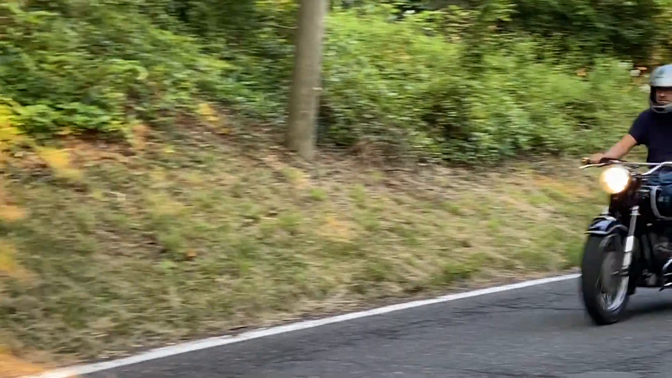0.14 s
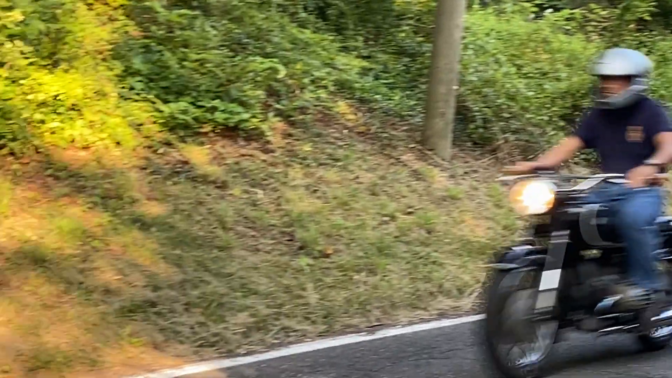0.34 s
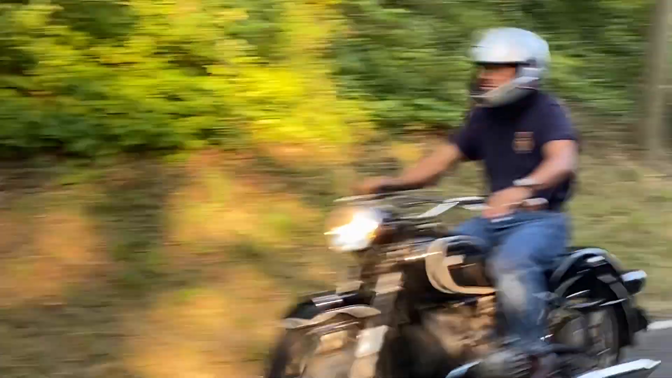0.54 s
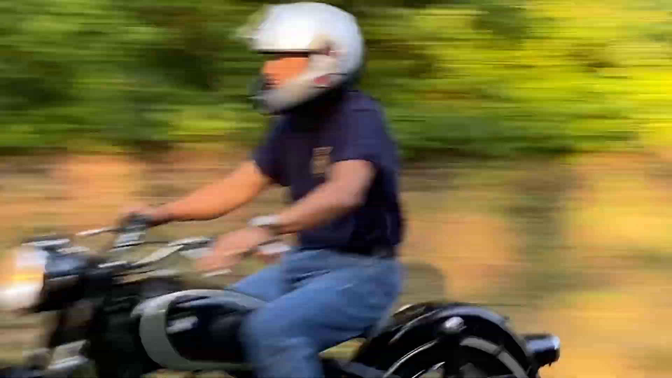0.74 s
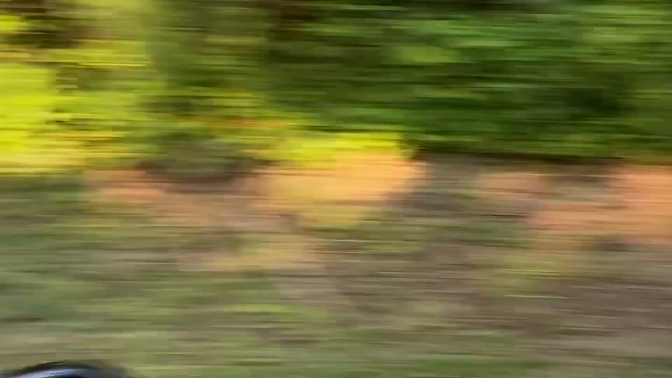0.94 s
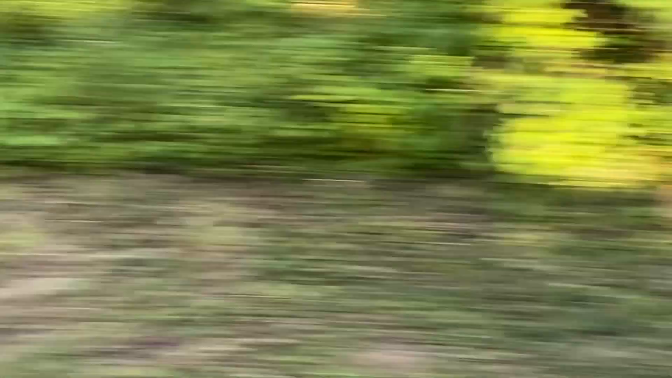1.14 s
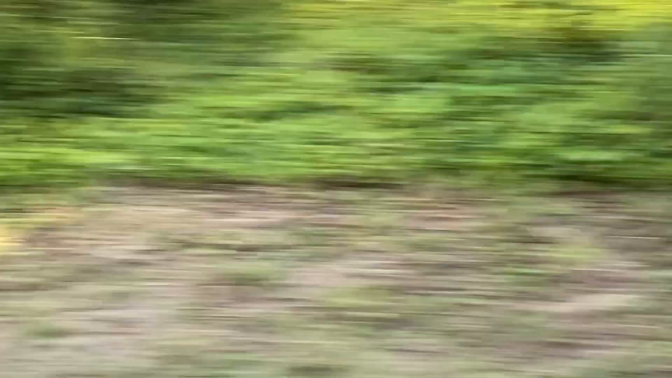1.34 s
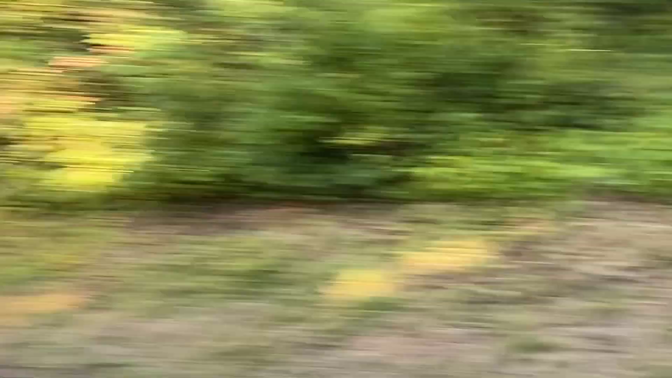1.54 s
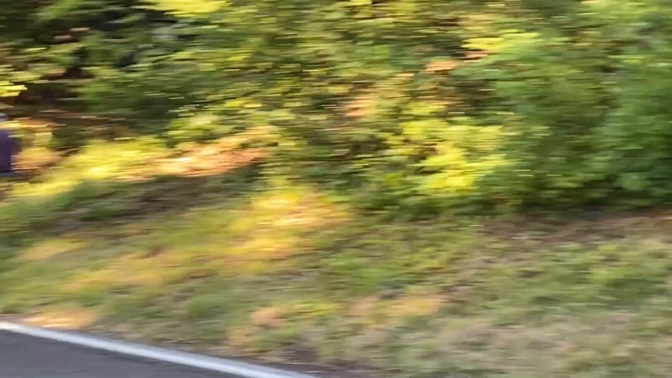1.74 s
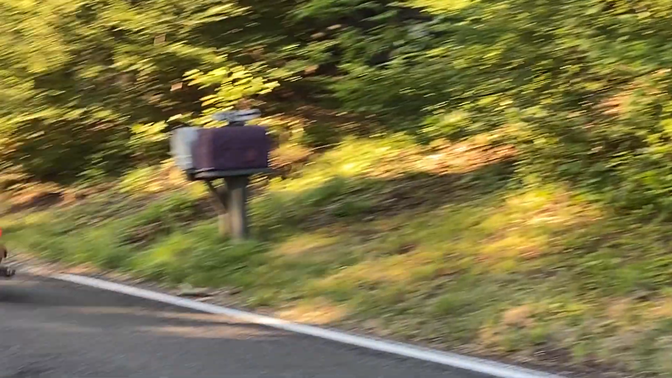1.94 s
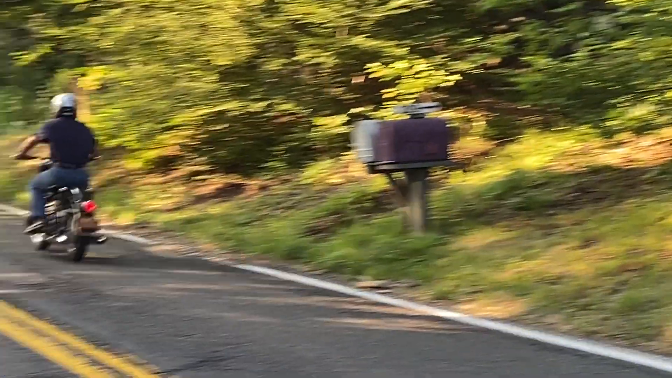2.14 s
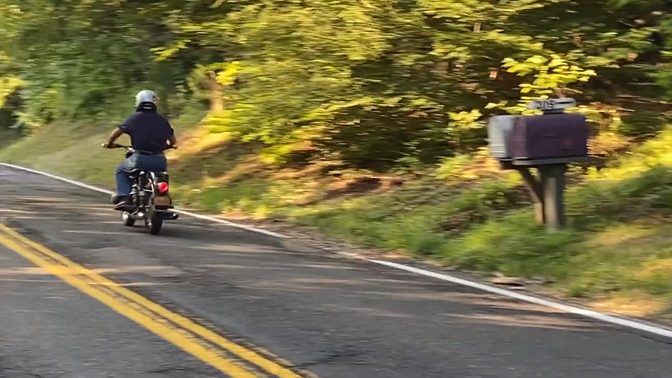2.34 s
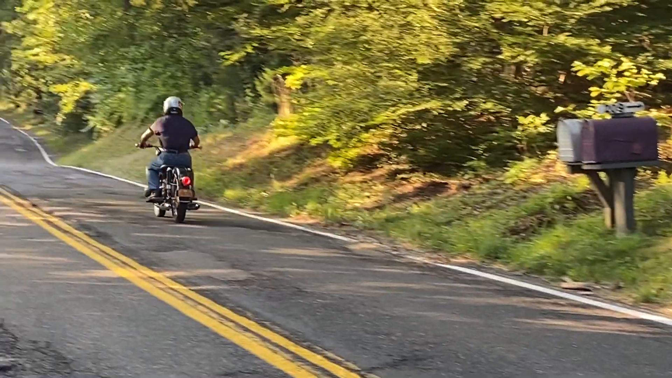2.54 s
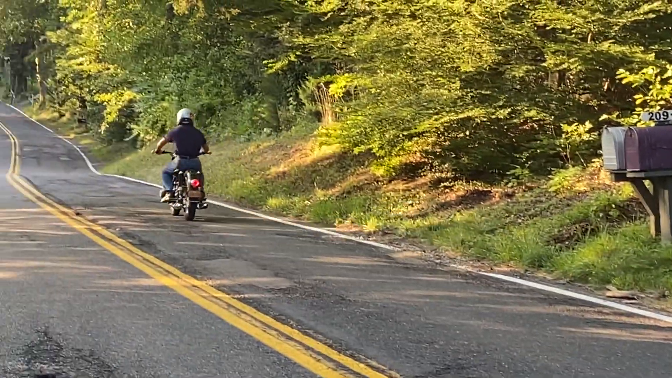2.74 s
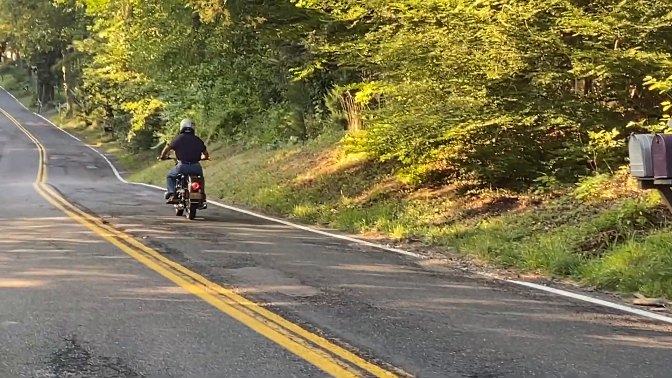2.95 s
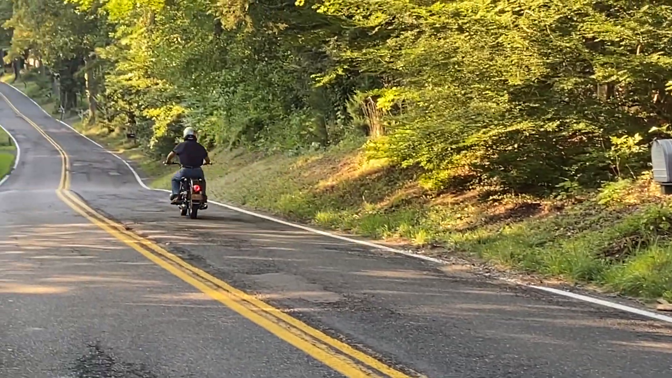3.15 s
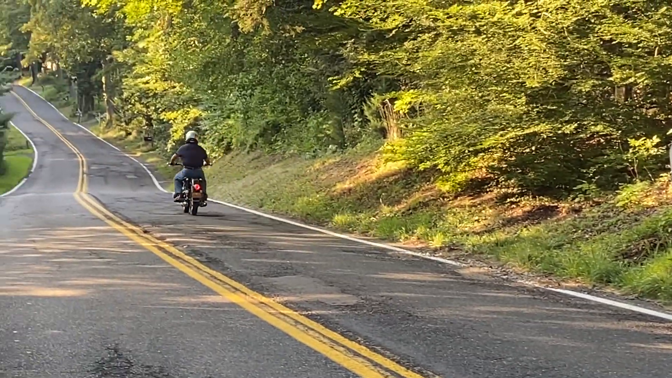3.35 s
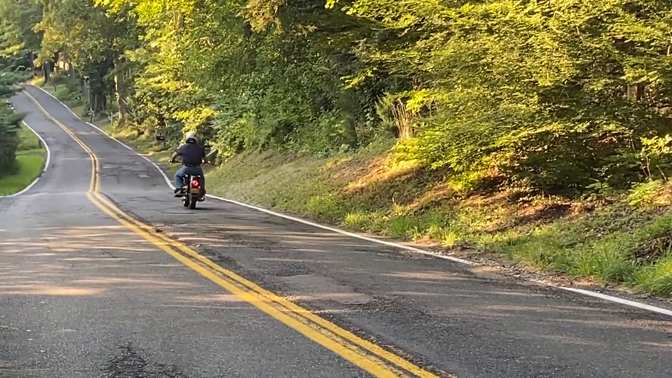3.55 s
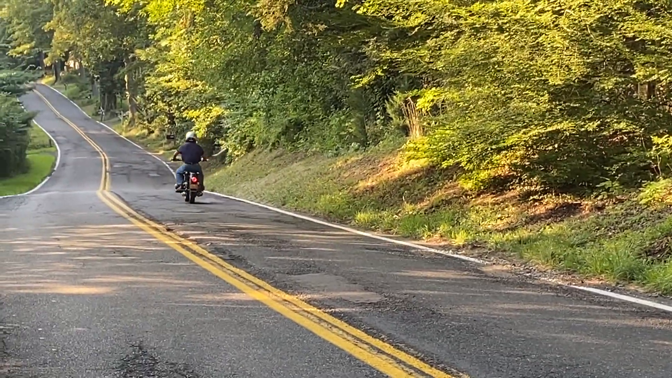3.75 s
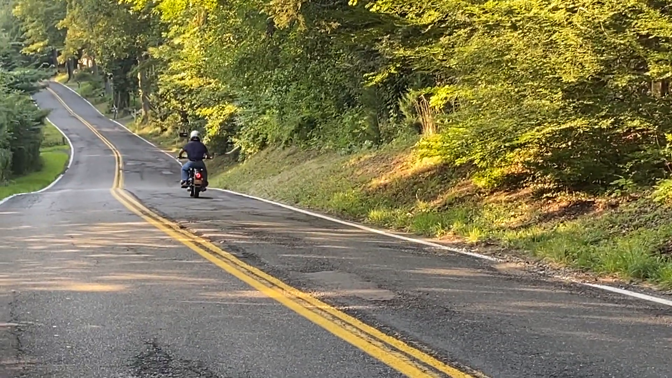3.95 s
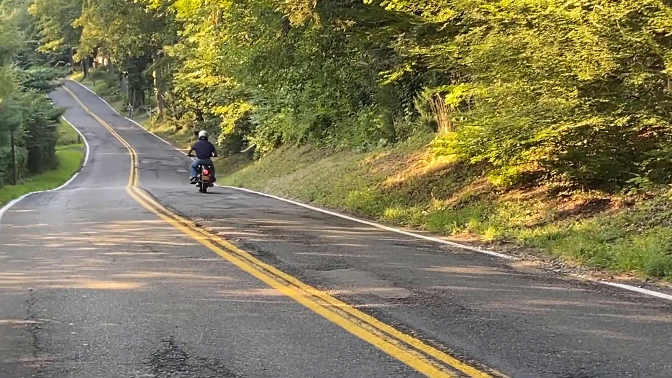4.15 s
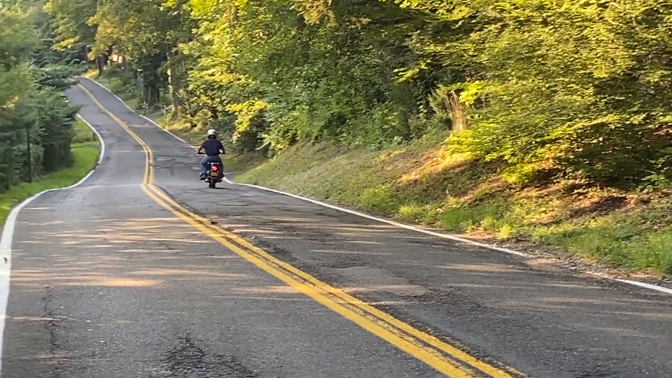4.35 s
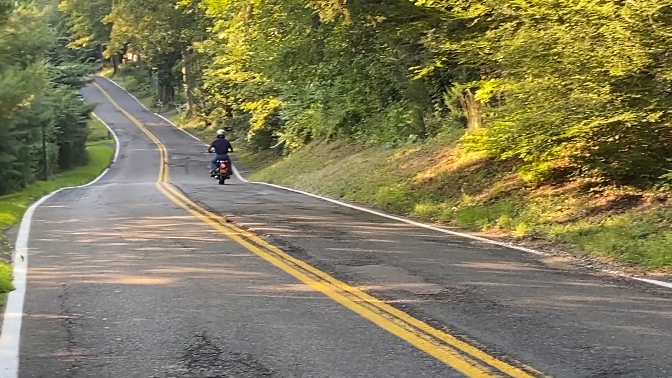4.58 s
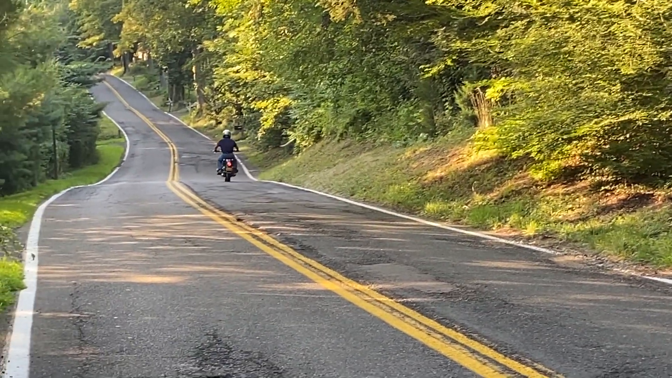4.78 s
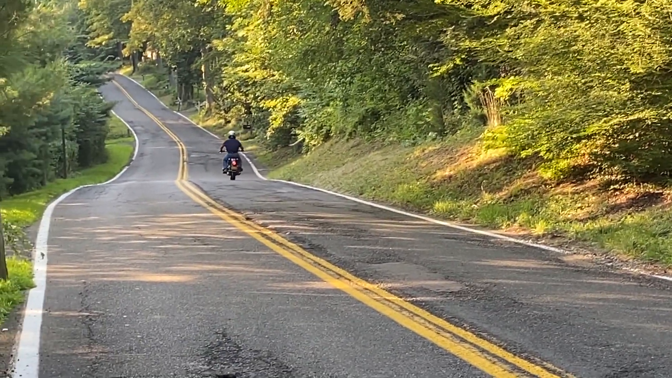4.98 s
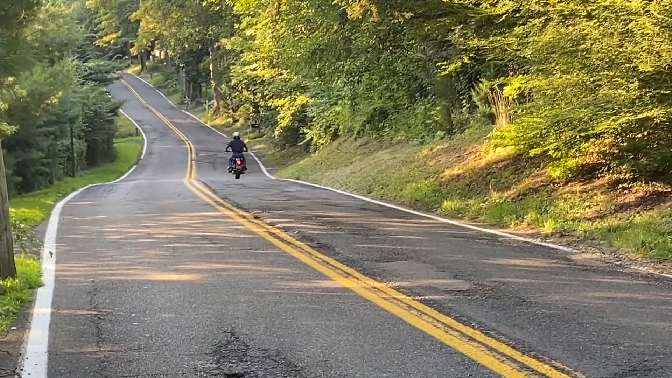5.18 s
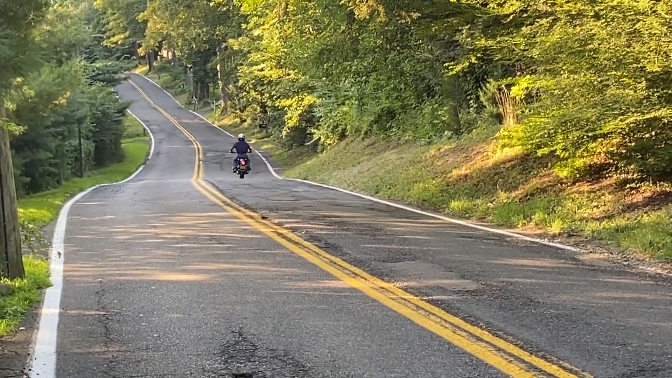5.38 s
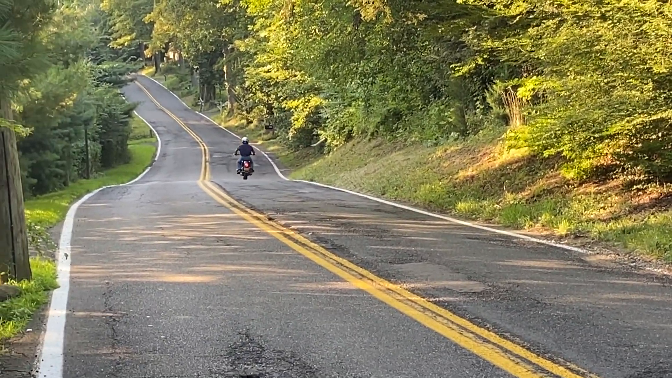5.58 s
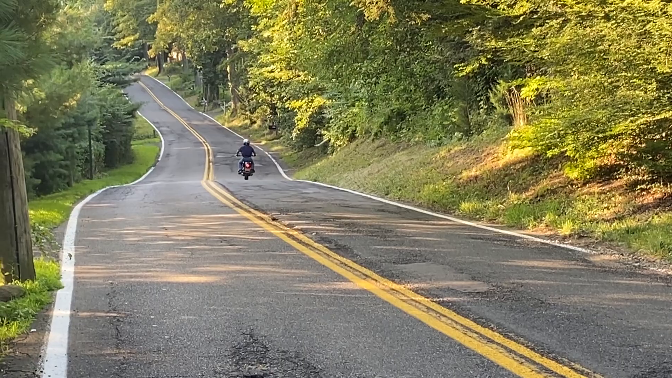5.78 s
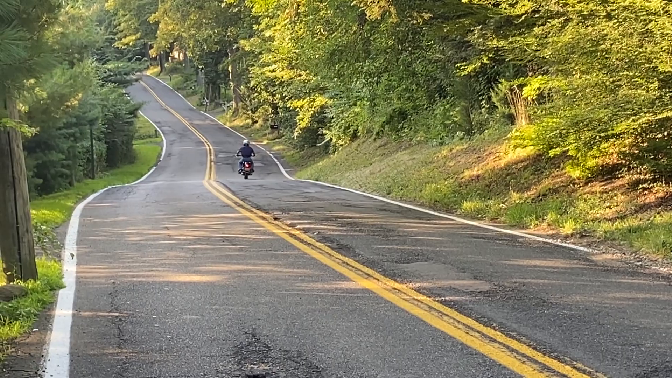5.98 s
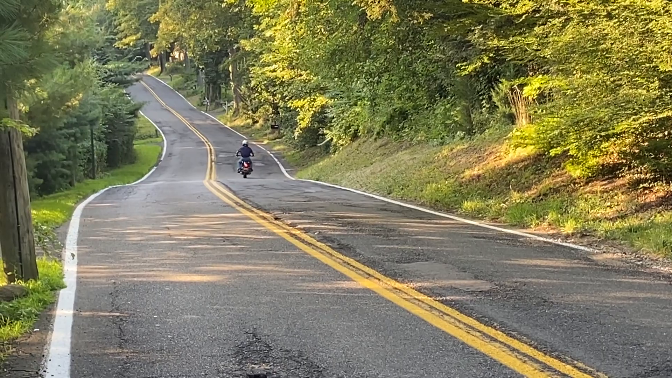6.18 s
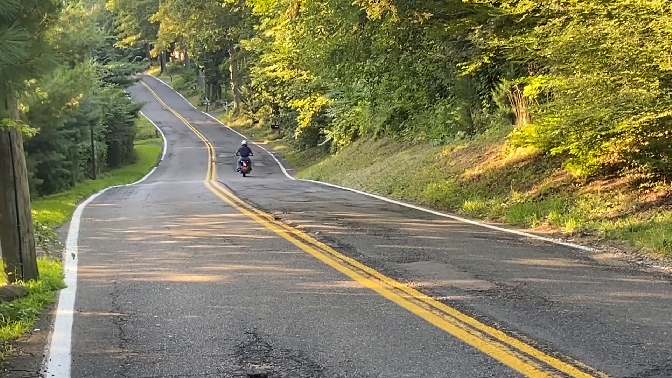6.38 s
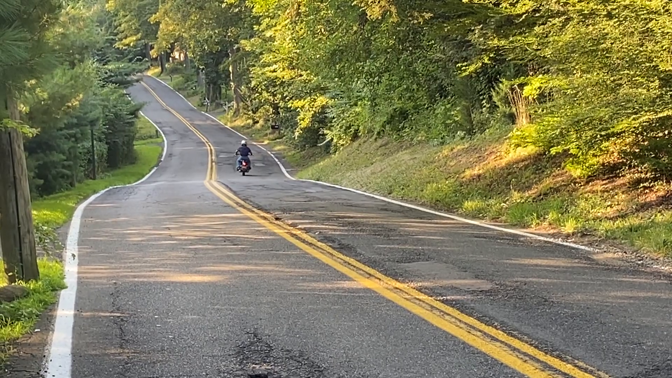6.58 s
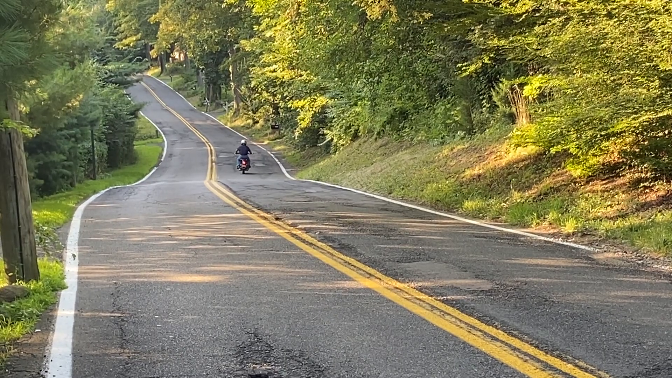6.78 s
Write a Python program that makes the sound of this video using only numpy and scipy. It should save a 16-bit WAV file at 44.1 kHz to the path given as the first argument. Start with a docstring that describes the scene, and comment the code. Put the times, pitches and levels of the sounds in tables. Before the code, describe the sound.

A twin-cylinder motorcycle approaches and passes a few metres from the microphone, its exhaust beating under rattling valves and tyre hiss. As it goes by, the throttle shuts and the engine falls in pitch, burbling with a few sharp pops. It pulls again and fades up the wooded country road with soft exhaust puffs, leaving faint insects and steady outdoor air beneath the distant engine.

```python
"""An air-cooled twin motorcycle passes 4 m from a phone's two microphones on a wooded country road.
Its firings beat in the exhaust and ring the pipe, silencer and crankcase; valves rattle, fins ring,
gas jets and tyres hiss. The rider shuts the throttle while passing: the engine slows and burbles
with sharp exhaust pops, then pulls again and fades up the hill with soft silencer puffs.
Insects sing in the verge, and a short, shifting tail widens the stereo image."""
import sys
import numpy as np
from scipy import signal
from scipy.fft import rfft, irfft, next_fast_len
from scipy.io import wavfile
from scipy.ndimage import map_coordinates

SR = 44100
rng = np.random.default_rng(int(sys.argv[2]) if len(sys.argv) > 2 else 0)


def file_out(sig):
    """Save sig as 16-bit WAV at sys.argv[1]."""
    # one column per channel
    cols = np.atleast_2d(sig).T
    # limit, then scale
    lim = np.clip(cols, -1, 1)
    pcm = np.round(lim * 32767).astype(np.int16)
    wavfile.write(sys.argv[1], SR, pcm)


N = 300762
T = np.arange(N) / SR

# Four-stroke cycle rate as heard from the roadside: time_s, rate_hz
CYCLE_RATE = [(0.0, 29.9), (0.55, 30.5), (0.72, 30.5), (.9, 30.3), (1.0, 29.8), (1.1, 28.9), (1.19, 28.3),
              (1.29, 28.2), (2.2, 21.3), (2.52, 19.7), (2.62, 20.0), (3.0, 20.0), (3.19, 20.5),
              (3.4, 20.25), (3.6, 20.5), (4.31, 20.8), (4.83, 20.4), (4.99, 20.6), (5.6, 20.3),
              (6.23, 20.3), (6.82, 20.0)]
# The rider's hand: time_s, opening (0-1)
THROTTLE = [(0, 0.87), (.95, 0.95), (1.1, 0.48), (2, 0.1), (3.06, 0), (3.2, 0.63), (3.75, 0.74),
            (4.0, 0.71), (4.5, 0.4), (4.7, 0.11), (5.4, 0.18), (6.82, 0.21)]
# Failed firings, where the exhaust drops out: time_s, depth_db, half_length_s
MISFIRES = [(1.518, -1.5, 0.0079), (1.745, -5.5, 0.019), (1.82, -26, 0.0038), (2.078, -10, 0.0078),
            (2.116, -21, 0.0054), (2.398, -6, 0.012), (2.679, -27, 0.0057), (5.58, -8, 0.0055),
            (5.63, -21, 0.0062), (6.409, -8, 0.0048), (6.78, 0, .005)]
def motorcycle():
    """One crank times the exhaust and all the mechanical noise."""
    (rate_hz,), (throttle,) = curves(CYCLE_RATE), curves(THROTTLE)
    cycles = .625 + np.cumsum(rate_hz) / SR
    tailpipe = exhaust(cycles, throttle) + burble(cycles, throttle)
    dropouts = amp(sum(db * bump(s, half) for s, db, half in MISFIRES))
    return dropouts * tailpipe + sum(part(cycles, throttle) for part in (clatter, growl, hiss, tick))

# Drawing level, throttle shutting, engine settling, easing off: time_s, spread_s
STAGES = [(.62, .06), (1.03, .025), (2.3, .15), (4.3, .22)]
ABREAST, SHUT, SETTLED, EASED = STAGES
def exhaust(cycles, throttle):
    """Gas pulses make a clean hum under throttle and a rougher chuff when coasting."""
    silencer_db = level(throttle, close_db=-30, doubling_db=4.5, air_db=-.07, behind_db=.5, open_db=8.5)
    coasting = fade(*SHUT) * (1 - fade(*SETTLED))
    hum_share = (.16 + .72 * throttle) * (1 - .5 * coasting)
    unsteady_db = 2.9 - 2.3 * throttle
    jitter = (.004 - .002 * throttle) * wobble(14)  # firings come early or late
    hum = exhaust_note(cycles + jitter, throttle, silencer_db + 10 * np.log10(hum_share), unsteady_db)
    return hum + amp(silencer_db) * np.sqrt(1 - hum_share) * chuff(cycles)

# Exhaust note at the microphone: time_s, order_4_db, order_2_db, orders_5_to_15_db
NOTE_LEVELS = [(0, -21.5, -28, -24), (.55, -18.5, -23.5, -20.5), (.8, -18.5, -19.5, -18.5),
               (.97, -20.5, -20, -17.5), (1.04, -20, -20, -21), (1.15, -20.5, -18, -23.5),
               (1.35, -21, -21.5, -31), (1.6, -16.5, -23, -32), (1.9, -22, -29, -41.5),
               (2.25, -25, -34, -39.5), (2.62, -33, -45, -39), (2.8, -31, -48, -39),
               (3.05, -31, -46, -38.5), (3.2, -30, -46, -34), (3.55, -31.5, -49, -33.5),
               (3.87, -31, -45, -37), (4.02, -35, -50, -40.5), (4.25, -39, -56, -40.5),
               (4.5, -34.5, -66, -40), (4.72, -35.5, -57, -46), (5.02, -32, -51, -43.5),
               (5.3, -34.5, -54, -46), (5.6, -35.5, -50, -47), (5.82, -37, -49, -47),
               (6.06, -48, -57, -48.5), (6.2, -43.5, -53, -47), (6.5, -43.5, -52, -47),
               (6.82, -45.5, -53, -48.5)]
# The cylinders fall out of step and the third order flares: time_s, boost_db
STUMBLES = [(1.07, 22.5), (1.2, 11.5), (1.29, 16), (1.42, 14)]
ODD_LAG_RAD = .7  # one cylinder beats late, so odd orders lag
def exhaust_note(cycles, throttle, hum_db, unsteady_db):
    """The beat is a stack of orders, multiples of the cycle rate; from behind it is turned over."""
    fourth_db, second_db, middle_db = curves(NOTE_LEVELS)
    third_db = level(throttle, close_db=-25, doubling_db=3.5, air_db=2, behind_db=-4.5, open_db=-9)
    third_db += sum(db * bump(s, .043) for s, db in STUMBLES)
    out = 0
    for k, db, sway in ((2, second_db, .8), (3, third_db, .6), (4, fourth_db, .5)):
        lag = fade(*SHUT) * (np.pi + coast_lag(k)) + ODD_LAG_RAD * (k % 2)
        out += amp(db + sway * unsteady_db * wobble(12)) * np.cos(2 * np.pi * k * cycles - lag)
    out += amp(middle_db) * overtones(cycles, range(5, 16), unsteady_db)
    out += amp(hum_db) * overtones(cycles, range(16, 29), unsteady_db)
    return np.sqrt(2) * out

def coast_lag(k):
    """Lag of order k in radians, which draws the beat out until the engine settles."""
    return .05 * min(k, 10) ** 2 * (1 - fade(*SETTLED))

# The exhaust from five positions on the road: order, relative_db
HEAD_ON = [(1, -38), (2, -5), (3, -12), (4, 0), (5, -11), (6, -11), (7, -8), (8, -18), (9, -14), (10, -17),
           (11, -16), (12, -8), (13, -16), (14, -21), (15, -20), (16, -22), (17, -16), (18, -26), (19, -14),
           (20, -16), (21, -10), (22, -15), (23, -18), (24, -27), (25, -22), (26, -19), (27, -23),
           (28, -22)]
ALONGSIDE = [(1, -29), (2, -1), (3, -10), (4, 0), (5, -6), (6, -7), (7, -8), (8, -9), (9, -11), (10, -8),
             (11, -16), (12, -10), (13, -16), (14, -17), (15, -20), (16, -26), (17, -21), (18, -23),
             (19, -16), (20, -13), (21, -8), (22, -16), (23, -16), (24, -20), (25, -18), (26, -9),
             (27, -21), (28, -16)]
JUST_PAST = [(1, -37), (2, -4), (3, -9), (4, 0), (5, -16), (6, -20), (7, -24), (8, -24), (9, -24),
             (10, -12), (11, -26), (12, -19), (13, -26), (14, -25), (15, -30), (16, -27), (17, -30),
             (18, -25), (19, -25), (20, -21), (21, -21), (22, -22), (23, -24), (24, -25), (25, -26),
             (26, -30), (27, -29), (28, -31)]
FROM_BEHIND = [(1, -49), (2, -16), (3, -14), (4, 0), (5, -16), (6, -7), (7, -18), (8, -17), (9, -16),
               (10, -23), (11, -18), (12, -16), (13, -18), (14, -12), (15, -23), (16, -16), (17, -21),
               (18, -21), (19, -28), (20, -25), (21, -29), (22, -25), (23, -23), (24, -22), (25, -14),
               (26, -10), (27, -14), (28, -23)]
UP_THE_HILL = [(1, -46), (2, -15), (3, -14), (4, 0), (5, -19), (6, -11), (7, -29), (8, -24), (9, -31),
               (10, -23), (11, -25), (12, -22), (13, -31), (14, -21), (15, -30), (16, -27), (17, -32),
               (18, -29), (19, -34), (20, -32), (21, -32), (22, -27), (23, -27), (24, -25), (25, -21),
               (26, -10), (27, -21), (28, -21)]
def overtones(cycles, orders, unsteady_db):
    """A group of orders whose balance and phases shift with throttle and viewpoint."""
    abreast, shut, settled, eased = (fade(*stage) for stage in STAGES)
    head_on, pulling = 1 - fade(.72, .1), settled * (1 - fade(4.65, .1))
    views = np.array([HEAD_ON, ALONGSIDE, JUST_PAST, FROM_BEHIND, UP_THE_HILL])[:, :, 1].T
    stack, power = 0, 0
    for k in orders:
        nose_db, side_db, past_db, rear_db, hill_db = views[k - 1]
        phases = np.array([.013, .012]) * k * k * rng.standard_normal(2) - ODD_LAG_RAD * (k % 2)
        lead = .25 * min(k - 4, 5) * head_on  # head-on the beat rises fast
        pipe_lag = 1.7 * np.exp(-(k - 5.5) ** 2) * pulling  # the pipe holds back a few orders
        ahead_db = nose_db + abreast * (side_db - nose_db)
        behind_db = past_db + settled * (rear_db - past_db) + eased * (hill_db - rear_db)
        ahead = np.sqrt(1 - shut) * amp(ahead_db) * np.exp(1j * (phases[0] + lead))
        behind = -np.sqrt(shut) * amp(behind_db) * np.exp(1j * (phases[1] - coast_lag(k) - pipe_lag))
        drift = unsteady_db * (.1 * wobble(6) + .15 * wobble(1))
        tone = np.real((ahead + behind) * np.exp(1j * (2 * np.pi * k * cycles + drift)))
        stack += amp(unsteady_db * wobble(6)) * tone
        power += abs(ahead) ** 2 + abs(behind) ** 2
    return stack / np.sqrt(power)

# Silencer resonances from ahead and behind: pitch_hz, width_hz, gain_db
SILENCER_AHEAD = [(631, 29, 4), (705, 140, -26), (500, 360, -9)]
SILENCER_BEHIND = [(516, 143, -2.5), (628, 99, 0.5), (742, 159, -5.5)]
def chuff(cycles):
    """Puffs of gas pass through two chambers in a row."""
    gas = puffs(cycles, decay=.49, uneven_db=-1.5, steady=.95)
    ahead, behind = (resonant(resonant(gas, box), box) for box in (SILENCER_AHEAD, SILENCER_BEHIND))
    return blend(fade(.877, .0057), ahead, behind)

# Tone of the exhaust pipe: frequency_hz, gain_db
PIPE_TONE = [(20, -36), (45, -6), (65, 4), (95, 13), (130, 3), (170, -6.5), (250, -8), (320, -5),
             (420, -16), (900, -80)]
def burble(cycles, throttle):
    """Firings of random strength ring the pipe between the orders."""
    firings = np.diff(np.floor(2 * cycles), prepend=0) * np.sqrt(3) * rng.uniform(-1, 1, N)
    db = level(throttle, close_db=-34, doubling_db=6, air_db=2, behind_db=16.5, open_db=1.5)
    return amp(db) * coloured(firings + .017 * rng.standard_normal(N), PIPE_TONE)

# Near pops and far silencer puffs: start_s, level_db, hollow_relative_db, length_s
EXHAUST_BURSTS = [(1.125, -15, -23, 0.02), (1.43, -21.5, -18, 0.06), (1.507, -22, 11, 0.016),
                  (1.733, -19, -11, 0.0084), (1.751, -21, -10, 0.019), (1.7802, -19, 20, 0.011),
                  (1.79, -22, 16, 0.013), (1.804, -25, 9, 0.061), (1.816, -26, 23, .01),
                  (2.004, -30, -1, 0.013), (2.12, -34.5, 11, 0.02), (2.546, -46, 27, 0.05),
                  (2.733, -48, 27, .015), (3.139, -48, 27, .015), (3.681, -49, 30, 0.02),
                  (3.876, -50, 29, .012), (3.91, -49, 29, .02), (4.366, -52, 30, .012),
                  (4.412, -55, 31, 0.014)]
def exhaust_bursts():
    """Sharp exhaust pops after the pass, then soft hollow silencer puffs farther off."""
    crack, hollow = np.zeros(N), np.zeros(N)
    for s, db, hollow_db, length in EXHAUST_BURSTS:
        age = np.clip((T - s) / length, 0, None)
        burst = (1 - np.exp(-6 * age)) * np.exp(-age ** 2) * rng.standard_normal(N)
        crack += amp(db) * burst
        hollow += amp(db + hollow_db) * burst
    band = lambda lo, hi: lambda hz: 1 / (1 + (lo / (hz + 1)) ** 4) / (1 + (hz / hi) ** 2)
    return filtered(crack, band(360, 3360)) + filtered(hollow, band(320, 620))

# Valves, gears and tyres, close by and far up the road: frequency_hz, gain_db
CLATTER_NEAR = [(300, 1), (700, 3), (1000, 3), (1550, 0.5), (2000, -3.5), (2500, -0.5), (3800, -3),
                (4700, -12.5), (6500, -26)]
CLATTER_FAR = [(250, -0.5), (370, -15), (480, 0), (800, -1.5), (1100, -0.5), (1630, -5), (2000, -9),
               (2900, -11), (3600, -9.5), (4500, -23), (6500, -33)]
VALVE_LEAD_CYCLES = .18
def clatter(cycles, throttle):
    """Metal rattles just before each beat; far off, the banks blur it."""
    near = coloured(puffs(cycles + VALVE_LEAD_CYCLES, decay=2, uneven_db=2, steady=.6), CLATTER_NEAR)
    far = coloured(puffs(cycles, decay=1, uneven_db=1.5, steady=1.5), CLATTER_FAR)
    db = level(throttle, close_db=-24, doubling_db=6.5, air_db=2, behind_db=-1.5, open_db=1.5)
    return amp(db) * (blend(fade(1.81, .25), near, far) + fins(cycles))

# Metal parts, loudest facing the microphone: pitch_hz, width_hz, relative_db, facing_s, spread_s
FIN_MODES = [(4135, 60, -8, .18, .22), (4135, 70, -12, 1.15, .3), (3050, 50, -8.5, .33, .28),
             (3050, 70, -11, .8, .1), (3060, 60, -14, 1.65, .4), (1740, 60, -10, .76, .2),
             (2800, 55, -10.5, 1.0, .22), (3410, 45, -12, .92, .12), (3675, 50, -13, .4, .5),
             (3700, 60, -11, 1.2, .22), (1690, 60, -6, 3.7, .8), (1400, 22, -4, 6.2, .8),
             (1600, 40, -6, 6.2, .8), (1640, 55, -8, 4.9, .5), (1720, 70, -8, 1.22, .13),
             (2420, 200, -11, .42, .3), (6300, 95, -20, .6, .31), (3970, 170, -13, .65, .1),
             (1500, 210, -6, .87, .27), (1560, 120, -7, 1.2, .2), (5210, 200, -15, .4, .5),
             (5190, 90, -17, 1.1, .35), (5460, 90, -18, 1.1, .35), (1175, 83, -6, 3.55, .3),
             (2950, 60, -17, 4.16, .74), (2800, 320, -14.5, 5.1, .7), (1150, 160, -3, 6.65, .47)]
def fins(cycles):
    """Each part is struck once a cycle, at its own moment, and rings on its note."""
    out = 0
    for hz, width, db, s, spread in FIN_MODES:
        turn = cycles + rng.random()
        blur = .82 if s > 2.6 else .22  # echoes steady the ring once the machine is away
        rattle = puffs(turn / 2, decay=5, uneven_db=1.5, steady=blur)
        blows = 13 * np.diff(np.floor(turn), prepend=np.floor(turn[0]))
        out += amp(db - 4.3 * ((T - s) / spread) ** 2) * resonant(rattle + blows, [(hz, width, 0)])
    return doppler(out)

# Loud valve taps within a few metres: start_s, level_db, pitch_hz
VALVE_TAPS = [(.404, -16, 2540), (.4567, -19, 3170), (.62, -16, 4180), (.636, -21, 6400),
              (.6832, -17, 3070), (.767, -19, 6100), (.7837, -12, 3820), (.786, -16, 4440),
              (.8143, -12, 3030), (.832, -17, 5130), (.834, -21, 6400), (.863, -11, 1570), (.9, -23, 5700),
              (.918, -16, 3470), (.929, -16, 2780), (1.123, -16, 3600), (1.226, -19, 3600),
              (1.37, -23, 3600)]
def taps(t60_s=.012):
    """A valve tap briefly rings a fin and two neighbours near its note."""
    out, t = np.zeros(N + SR), np.arange(SR // 50) / SR
    for s, db, hz in VALVE_TAPS:
        neighbours = np.sin(2 * np.pi * hz * rng.uniform(.85, 1.15, (2, 1)) * t).sum(axis=0)
        ring = np.sin(2 * np.pi * hz * t) + .6 * neighbours
        out[round(s * SR):][:len(t)] += amp(db - 60 * t / t60_s) * ring * (1 - np.exp(-t / .00067))
    return out[:N]

# Tone of the crankcase: frequency_hz, gain_db
CASE_TONE = [(700, -42), (900, 1.5), (1800, 1), (3000, -8), (4200, -15), (6000, -32)]
def growl(cycles, throttle, t60_s=.03, weak_cylinder=.55):
    """Every firing rings the case alike, so fine harmonics follow the crank into the treble."""
    firing = np.floor(2 * cycles)
    blows = np.diff(firing, prepend=firing[0]) * np.where(firing % 2, weak_cylinder, 1)
    t = np.arange(SR // 20) / SR
    ring = rng.standard_normal(len(t)) * amp(-60 * t / t60_s)
    db = level(throttle, close_db=-35, doubling_db=7, air_db=2, behind_db=-3.5, open_db=1)
    return amp(db) * coloured(signal.fftconvolve(blows, ring)[:N], CASE_TONE)

# Hiss close by: frequency_hz, gain_db
HISS_NEAR = [(3000, -21), (4500, 9.5), (6400, 3), (7800, -6), (11000, -10.5), (16000, -23)]
# Far hiss, a band up to about 3 kHz and a thin one at 8-10 kHz: frequency_hz, gain_db
HISS_FAR = [(3000, 2), (4500, -16), (6000, -31), (8000, -1.5), (10000, -6), (12500, -43), (16000, -55)]
def hiss(cycles, throttle):
    """Gas jets and tyres make a flickering hiss that pulses with the valves."""
    jets = puffs(cycles + VALVE_LEAD_CYCLES, decay=1.1, uneven_db=1.5, steady=.65)
    jets *= amp(1.2 * wobble(17))
    db = level(throttle, close_db=-40, doubling_db=5.5, air_db=3.5, behind_db=-.5, open_db=6.5)
    return amp(db) * blend(fade(3.7, 1), coloured(jets, HISS_NEAR), coloured(jets, HISS_FAR))

# Tone of a valve seating: frequency_hz, gain_db
SEAT_TONE = [(3000, -36), (5000, -14), (7500, -13.5), (11000, -8.5), (13000, -9), (16000, -24)]
def tick(cycles, throttle, lead_cycles=.3):
    """One valve seats once a cycle, ahead of the beat."""
    clicks = puffs((cycles + lead_cycles) / 2, decay=14, uneven_db=4, steady=.12)
    db = level(throttle, close_db=-60, doubling_db=6, air_db=3.5, behind_db=6, open_db=12.5)
    return amp(db) * coloured(clicks, SEAT_TONE)

CLOSEST_S, CLOSEST_M, SPEED_M_S = .85, 4, 11.01
RANGE_M = np.hypot(SPEED_M_S * (T - CLOSEST_S), CLOSEST_M)
def level(throttle, close_db, doubling_db, air_db, behind_db, open_db):
    """A layer's dB: lost per doubled range and per 10 m of air, shifted by tail view and throttle."""
    loss_db = doubling_db * np.log2(RANGE_M / CLOSEST_M) + air_db * (RANGE_M - CLOSEST_M) / 10
    return close_db - loss_db + behind_db * fade(SHUT[0], .056) + open_db * throttle

def doppler(x):
    """The sound's travel time shrinks, then grows: pitches fall as the machine goes by."""
    delay_s = RANGE_M / 343
    return map_coordinates(x, [(T - delay_s + delay_s[0]) * SR], mode="mirror")

# Short notes from the verge and up the road: start_s, level_db, pitch_hz, length_s
VERGE_NOTES = [(4.95, -61, 3360, .05), (5.98, -64, 3400, 0.058), (6.123, -57, 1520, .06),
               (6.265, -61, 3450, .04), (6.34, -66, 3420, .05), (6.397, -54, 1360, 0.043),
               (6.555, -52, 1360, .02), (6.6, -53, 1440, .03), (6.605, -59, 3500, .05)]
# Steady air in the woods: frequency_hz, gain_db
WOODLAND_AIR = [(25, -26), (50, 15.5), (120, 3), (230, -5.5), (370, -5), (800, -4), (1500, -15),
                (3400, -18), (6000, -32), (9000, -44), (12000, -72), (16000, -87)]
def verge(insect_hz=3450, sag=.03):
    """A thin band of far insects, a few notes that start sharp and sag, and steady air."""
    out = amp(-68 + 2.5 * wobble(5.9)) * resonant(rng.standard_normal(N), [(insect_hz, 110, 0)])
    t = np.arange(SR // 4) / SR
    for s, db, hz, length in VERGE_NOTES:
        turns = hz * (t + sag * length * (1 - np.exp(-2 * t / length)) / 2)
        envelope = np.minimum(t / .006, 1) * np.exp(-(t / length) ** 2)
        note = amp(db + 3) * envelope * np.sin(2 * np.pi * turns)
        out[round(s * SR):][:len(t)] += note[:N - round(s * SR)]
    return out + amp(-46) * coloured(rng.standard_normal(N), WOODLAND_AIR)

# Level of the shifting tail, strong in the mids and top, faint at 4-6 kHz: frequency_hz, gain_db
STEREO_WIDTH = [(60, -38), (250, -27), (500, -20), (800, -14), (1400, -11), (2700, -14), (4200, -40),
                (6400, -36), (8000, -6), (15000, -5)]
def stereo_spread(x, t60_s=.1):
    """A short, shifting tail, opposite in left and right, widens the sound."""
    t = np.arange(SR // 4) / SR
    tails = rng.standard_normal((6, len(t))) * amp(-60 * t / t60_s)
    shares = np.array([wobble(2.98) for _ in tails])
    shares = shares / np.linalg.norm(shares, axis=0) / np.linalg.norm(tails[0])
    wet = signal.fftconvolve(x * shares, tails, axes=1)[:, :N].sum(axis=0)
    return filtered(wet, lambda hz: amp(along(STEREO_WIDTH, hz))) * np.array([[1], [-1]])

def puffs(cycles, decay, uneven_db, steady):
    """Two decaying noise bursts a cycle, each its own size, over steady noise."""
    firing = 2 * cycles
    size = amp(uneven_db * rng.standard_normal(int(firing[-1]) + 1))[firing.astype(int)]
    return (steady + size * np.exp(-decay * (firing % 1))) * rng.standard_normal(N)

def amp(db):
    """Decibels to gain."""
    return 10 ** (np.asarray(db) / 20)

def unit(x):
    """Scaled to rms 1."""
    return x / np.sqrt(np.mean(x ** 2) + 1e-20)

def along(points, hz):
    """(Hz, value) points on a log axis."""
    f, v = np.transpose(points)
    return np.interp(np.log(hz + 1), np.log(f + 1), v)

def curves(rows):
    """One value per sample for each column after the time."""
    s, *cols = np.transpose(rows)
    return [np.interp(T, s, c) for c in cols]

def fade(s, spread):
    """A soft step from 0 to 1."""
    return 1 / (1 + np.exp(-(T - s) / spread))

def bump(s, spread):
    """A bell curve in time."""
    return np.exp(-((T - s) / spread) ** 2)

def blend(share, a, b):
    """Equal-power mix from a to b."""
    return np.sqrt(1 - share) * a + np.sqrt(share) * b

def wobble(rate):
    """A smooth random curve, rate knots a second."""
    return map_coordinates(rng.standard_normal(int(N * rate / SR) + 4), [T * rate])

def filtered(x, response):
    """x times a complex response of frequency."""
    m = next_fast_len(N + SR // 2)
    return irfft(rfft(x, m) * response(np.fft.rfftfreq(m, 1 / SR)), m)[..., :N]

def coloured(x, spectrum):
    """x shaped by (Hz, dB) points, rms 1."""
    return unit(filtered(x, lambda hz: amp(along(spectrum, hz))))

def resonant(x, modes):
    """x through (Hz, width, dB) resonances, rms 1."""
    return unit(filtered(x, lambda f: sum((-1) ** k * amp(db) * 1j * f * w / (c * c - f * f + 1j * f * w)
                                          for k, (c, w, db) in enumerate(modes))))

# Phase of the left channel against the right: frequency_hz, lead_rad
LEFT_LEAD = [(60, 0), (950, .2), (3600, .05), (7490, 0), (8790, -3), (9500, -3.5), (10800, -6.2),
             (11600, -6.4), (12600, -9), (13800, -9.6), (14800, -12.5), (15400, -12.6)]
# Level of the left channel against the right: frequency_hz, gain_db
LEFT_GAIN = [(30, -.3), (60, -.6), (125, -.9), (250, -1.4), (500, -1.2), (1000, -.3), (2000, .1),
             (15000, 0)]
def scene():
    """Left and right are nearly in phase below 7.5 kHz; stepped phase turns widen the treble."""
    mono = motorcycle() + exhaust_bursts() + taps() + verge()
    side = np.array([[.5], [-.5]])
    pair = lambda hz: amp(side * along(LEFT_GAIN, hz)) * np.exp(1j * side * along(LEFT_LEAD, hz))
    return filtered(mono, pair) + stereo_spread(mono)

def record(dry):
    """The phone rounds off the highest peaks and keeps only its own band."""
    low_hz, top_hz = 26, 15800
    soft = dry / (1 + np.abs(dry / .95) ** 6) ** (1 / 6)
    return filtered(soft, lambda hz: (hz < top_hz) / (1 + (low_hz / (hz + 1)) ** 6))

dry = scene()
out = record(dry)
file_out(out)
```